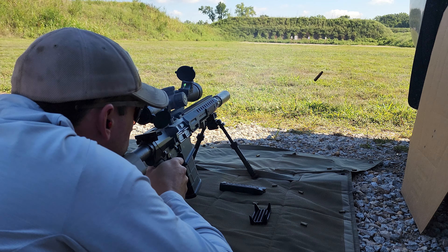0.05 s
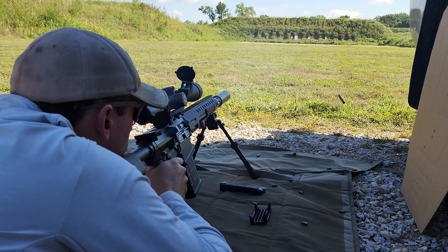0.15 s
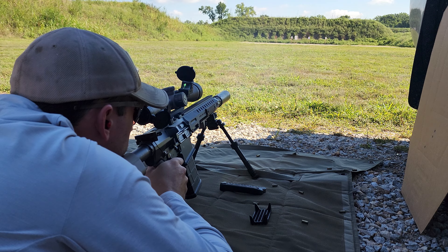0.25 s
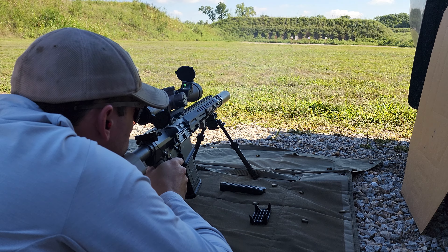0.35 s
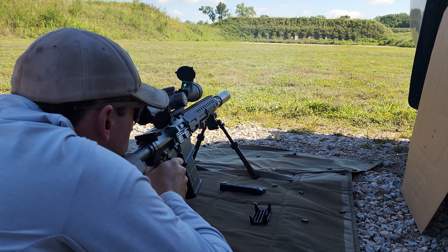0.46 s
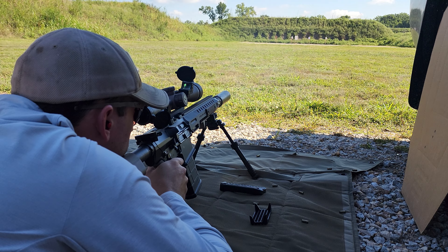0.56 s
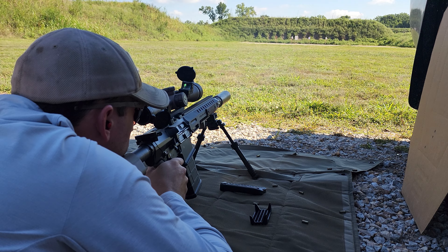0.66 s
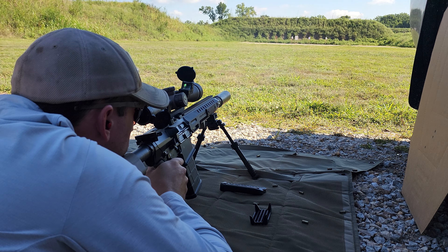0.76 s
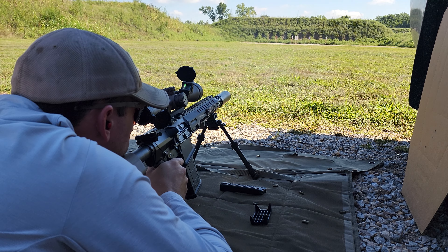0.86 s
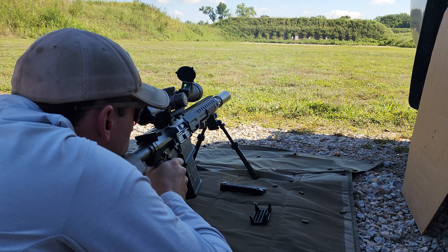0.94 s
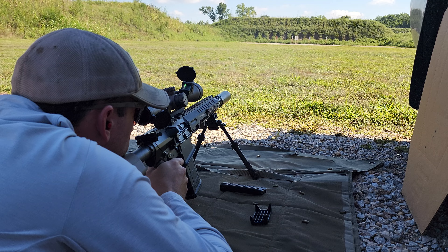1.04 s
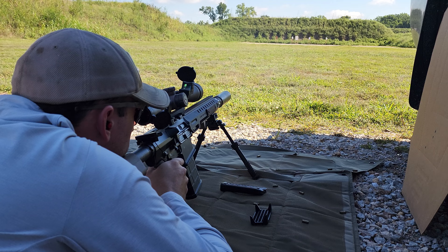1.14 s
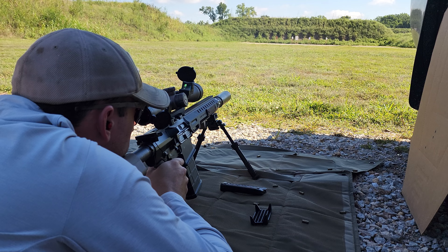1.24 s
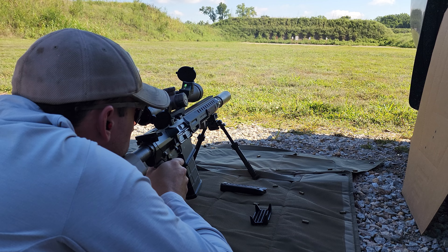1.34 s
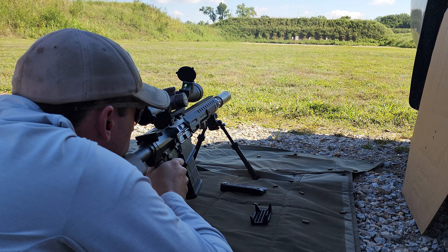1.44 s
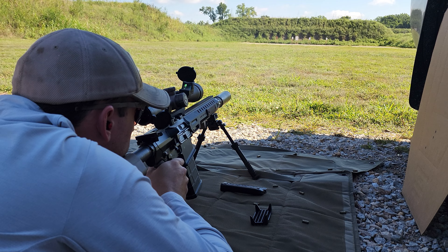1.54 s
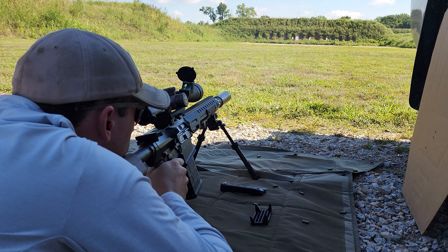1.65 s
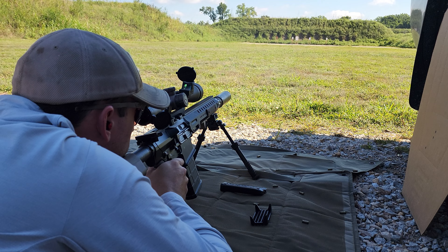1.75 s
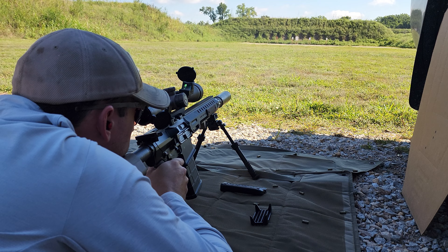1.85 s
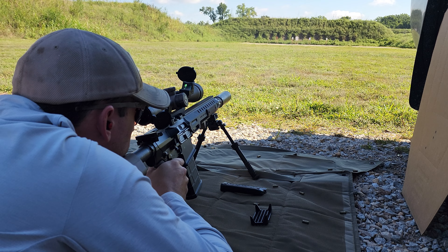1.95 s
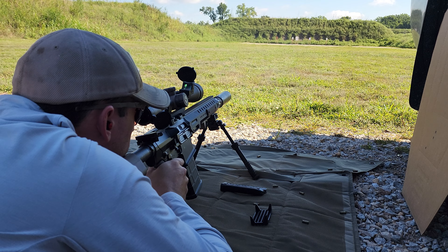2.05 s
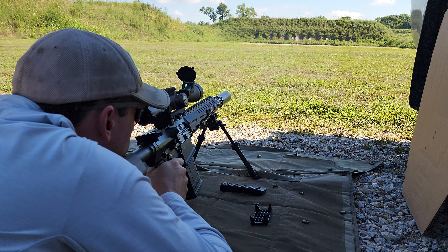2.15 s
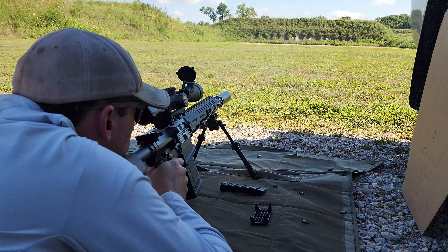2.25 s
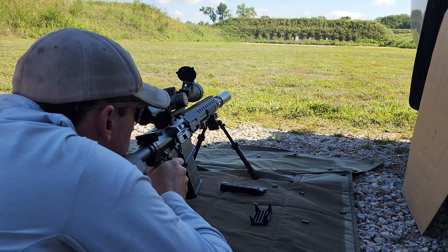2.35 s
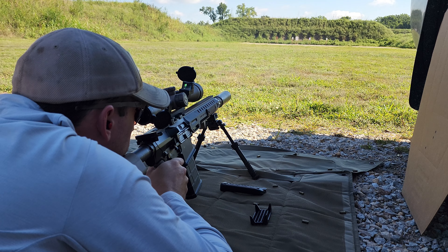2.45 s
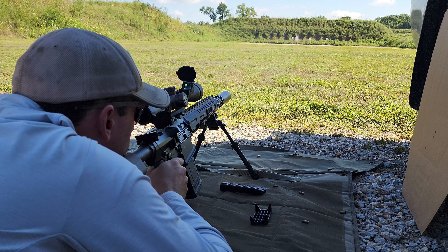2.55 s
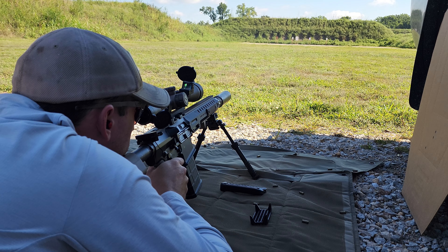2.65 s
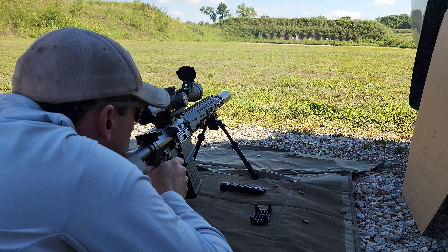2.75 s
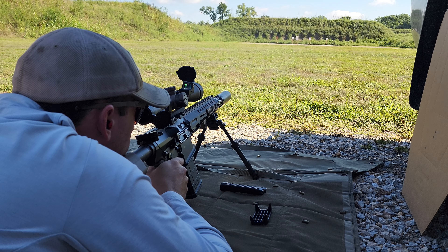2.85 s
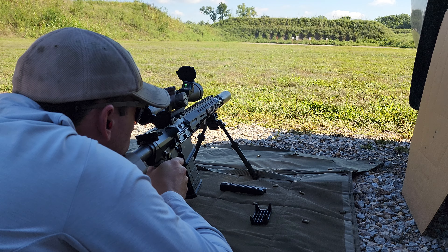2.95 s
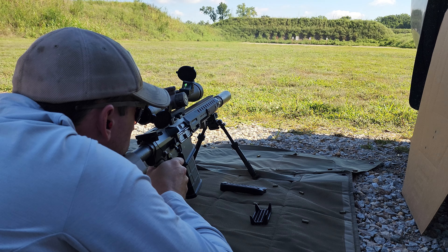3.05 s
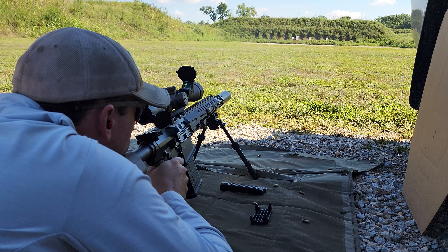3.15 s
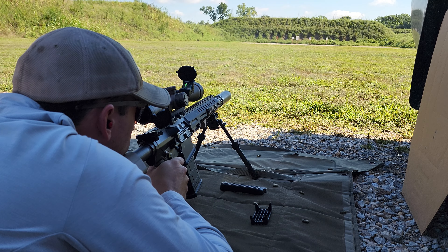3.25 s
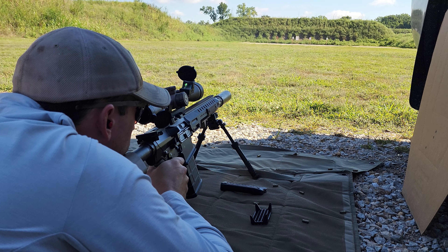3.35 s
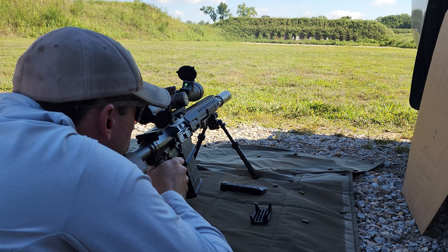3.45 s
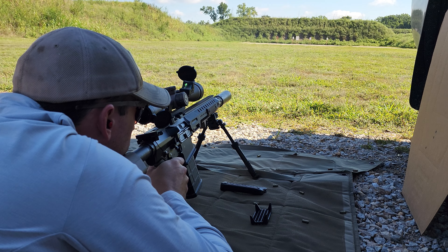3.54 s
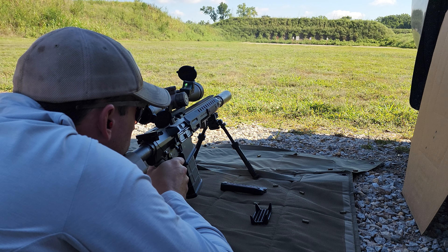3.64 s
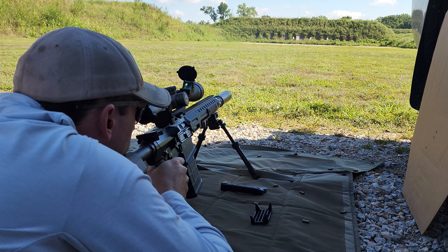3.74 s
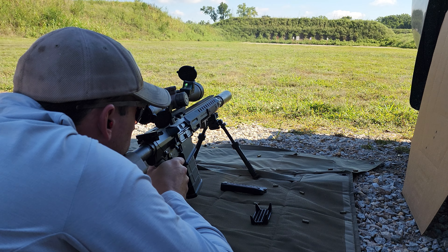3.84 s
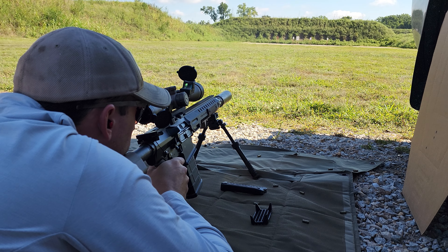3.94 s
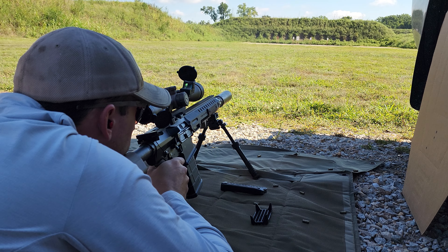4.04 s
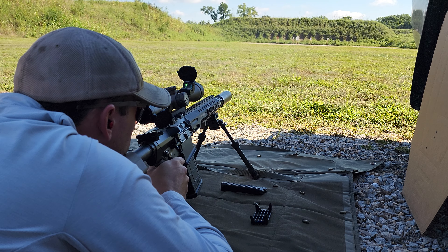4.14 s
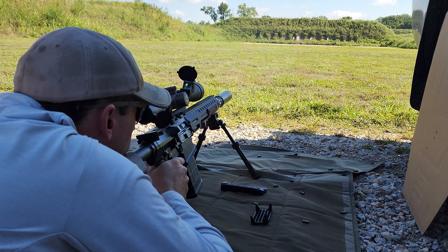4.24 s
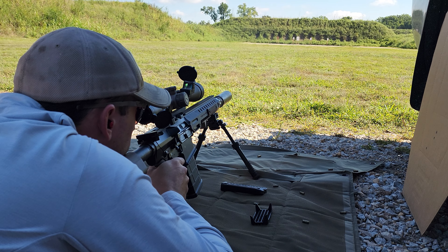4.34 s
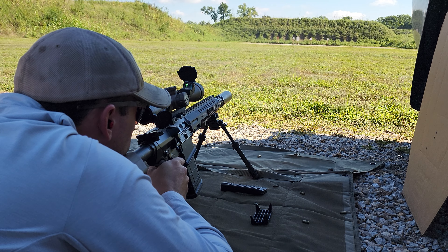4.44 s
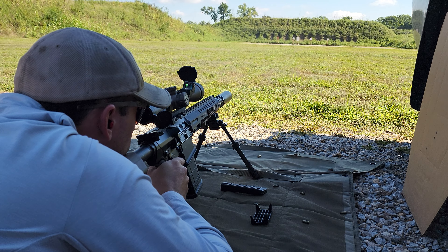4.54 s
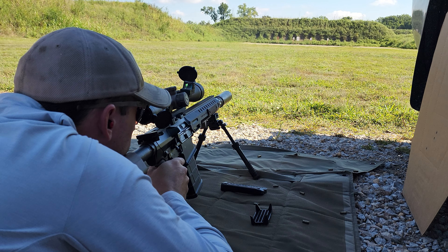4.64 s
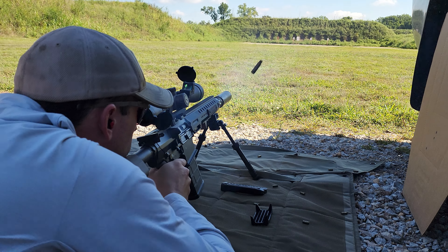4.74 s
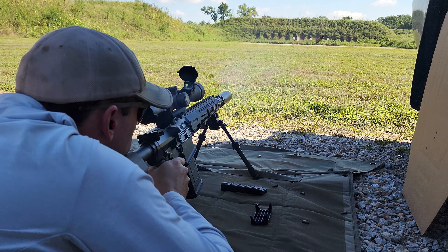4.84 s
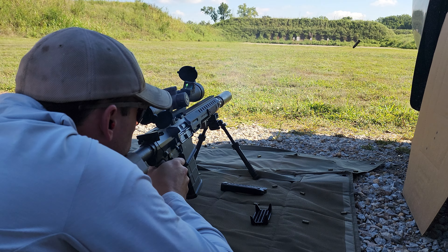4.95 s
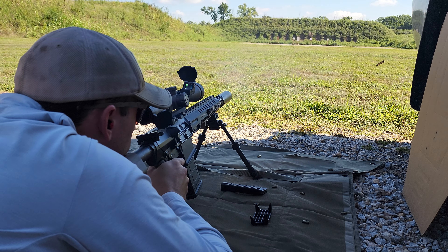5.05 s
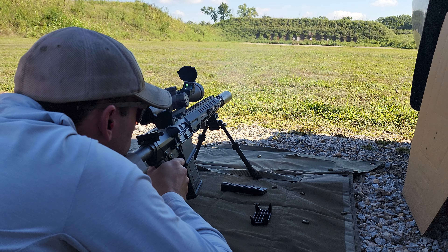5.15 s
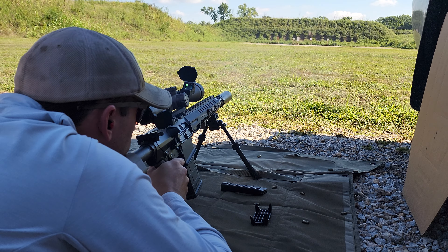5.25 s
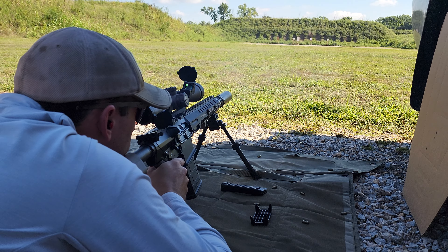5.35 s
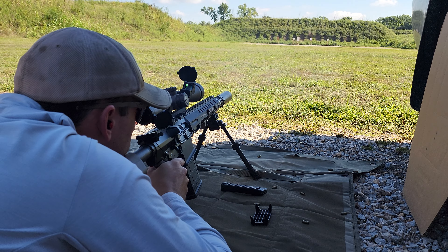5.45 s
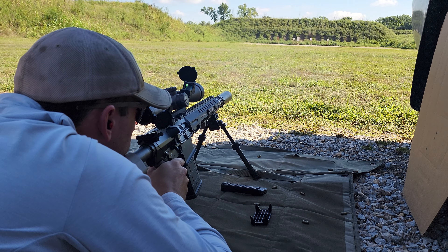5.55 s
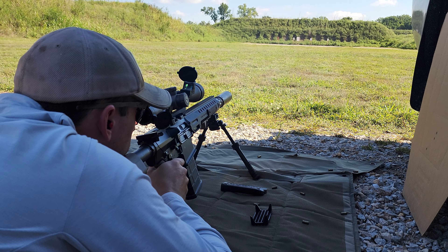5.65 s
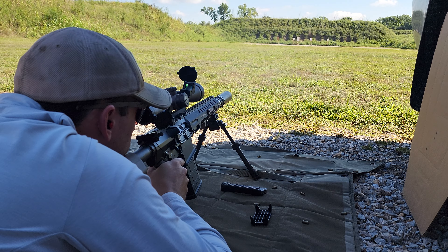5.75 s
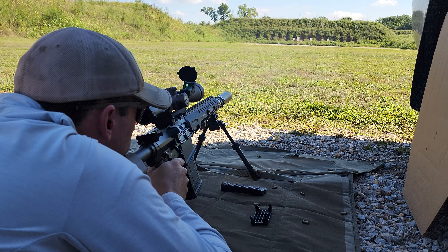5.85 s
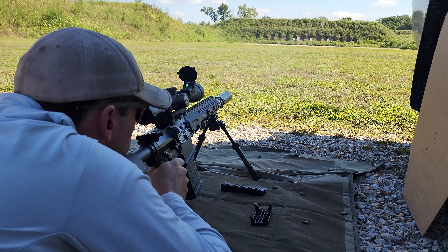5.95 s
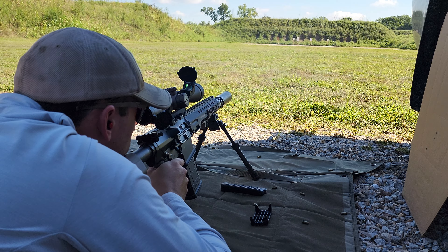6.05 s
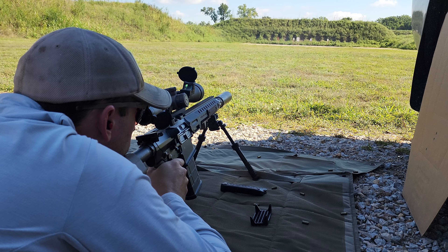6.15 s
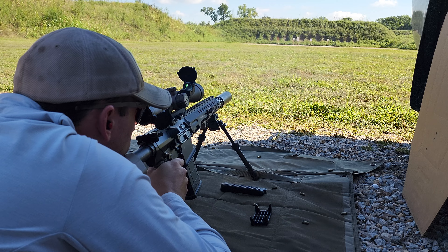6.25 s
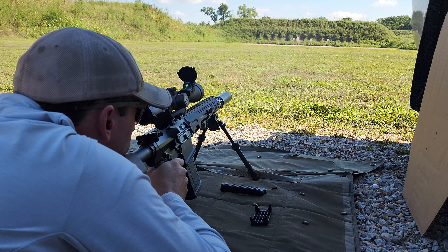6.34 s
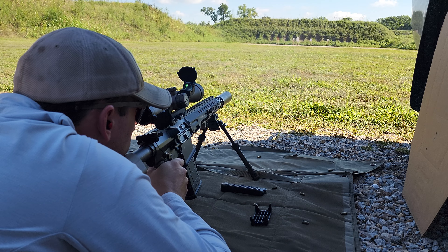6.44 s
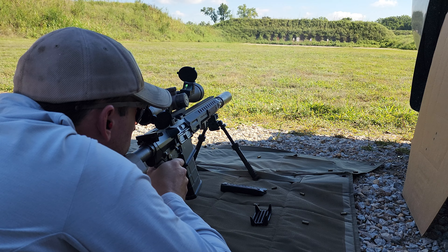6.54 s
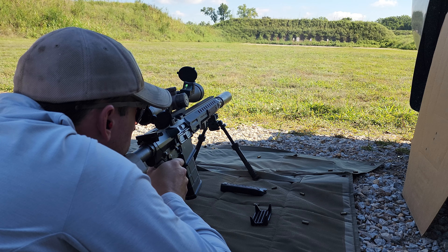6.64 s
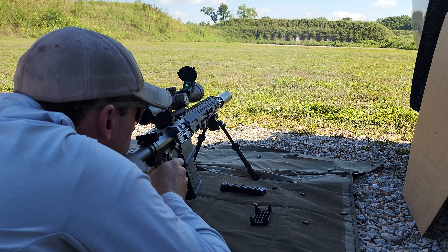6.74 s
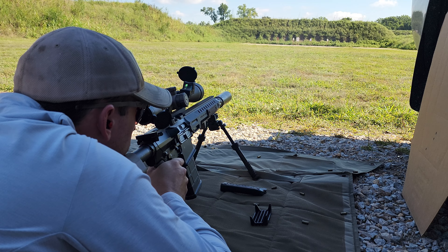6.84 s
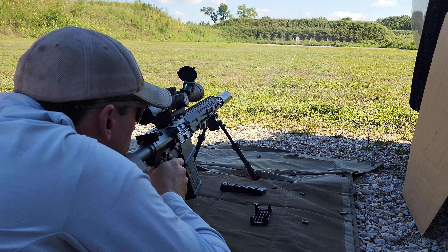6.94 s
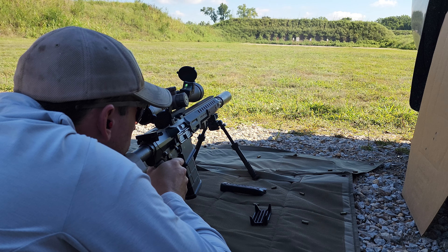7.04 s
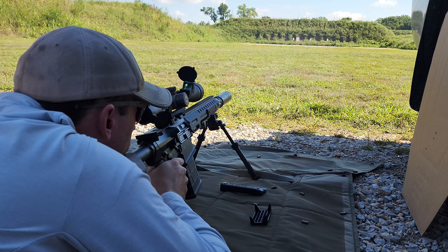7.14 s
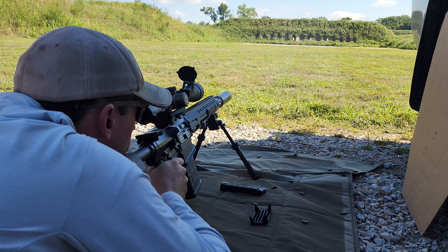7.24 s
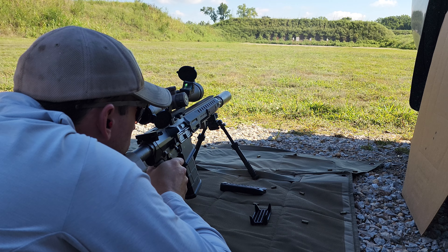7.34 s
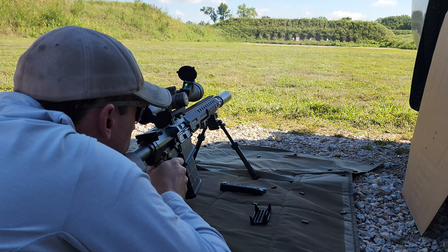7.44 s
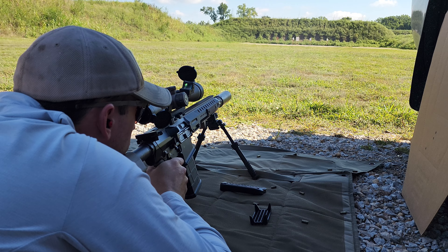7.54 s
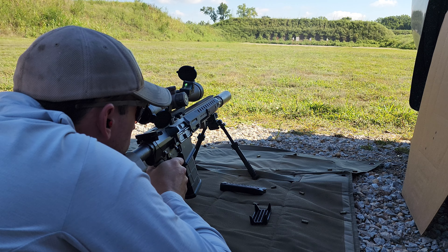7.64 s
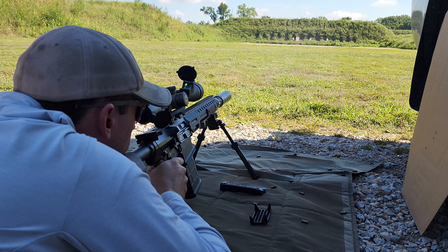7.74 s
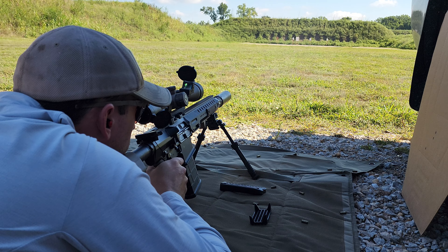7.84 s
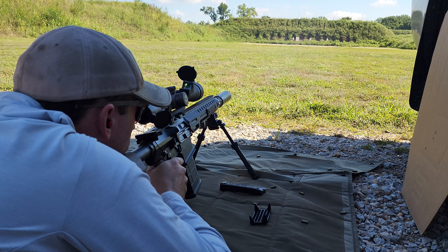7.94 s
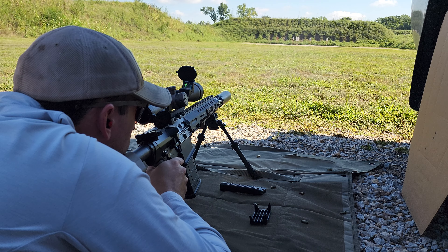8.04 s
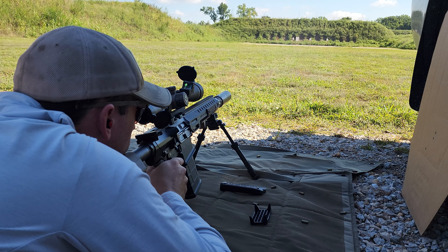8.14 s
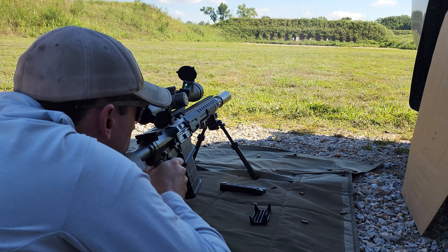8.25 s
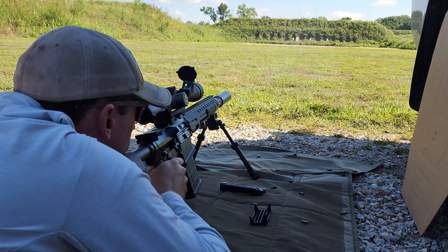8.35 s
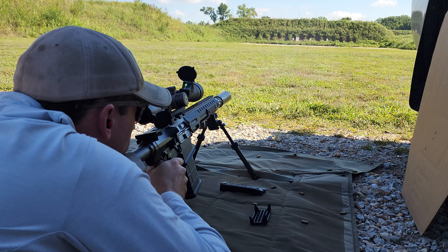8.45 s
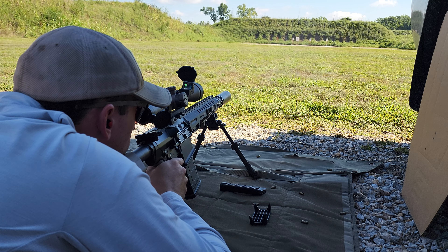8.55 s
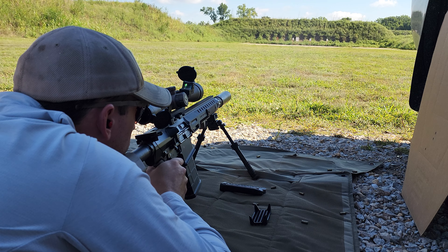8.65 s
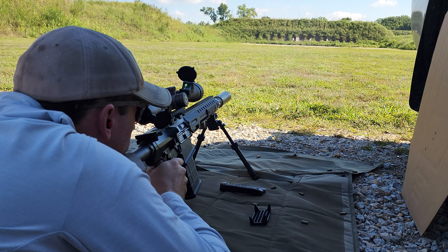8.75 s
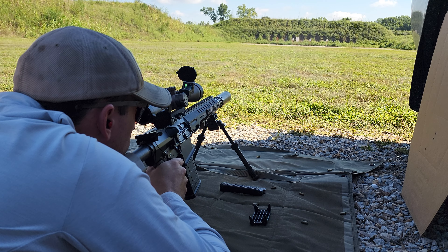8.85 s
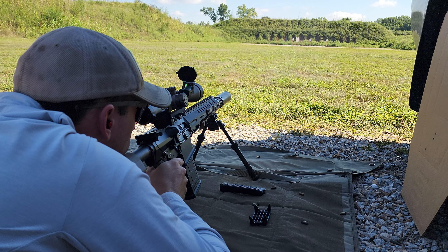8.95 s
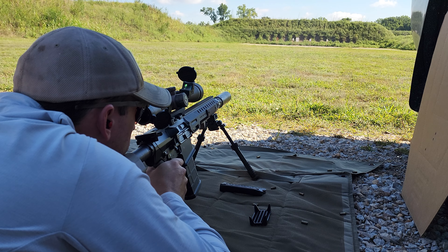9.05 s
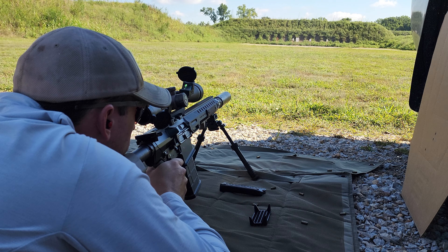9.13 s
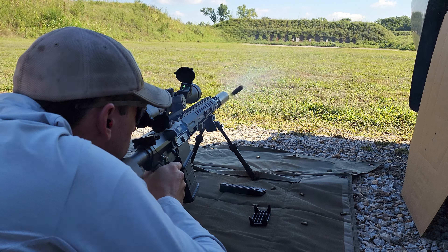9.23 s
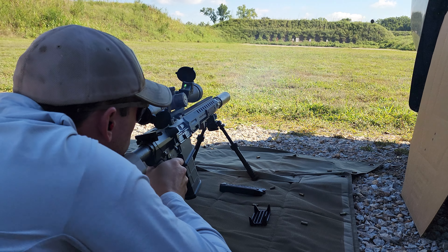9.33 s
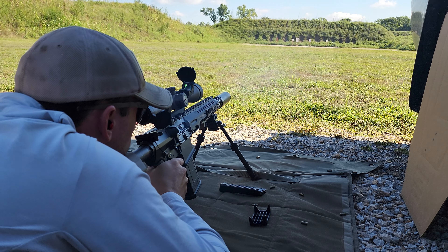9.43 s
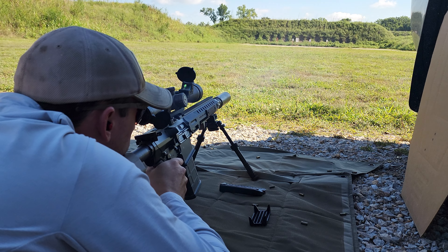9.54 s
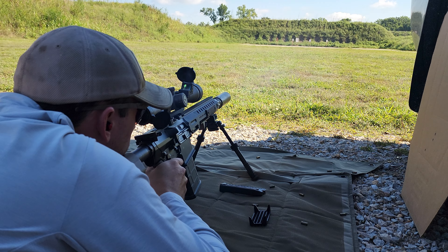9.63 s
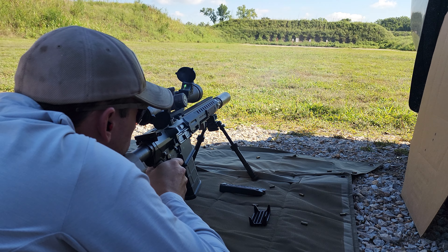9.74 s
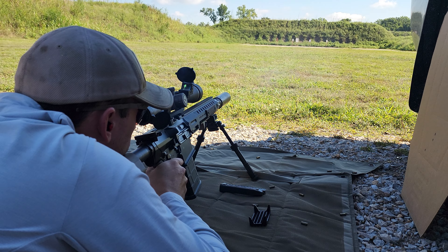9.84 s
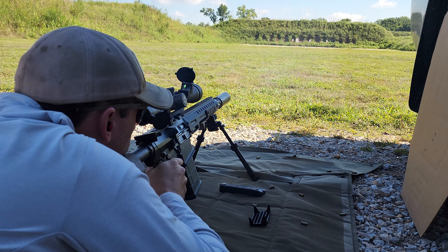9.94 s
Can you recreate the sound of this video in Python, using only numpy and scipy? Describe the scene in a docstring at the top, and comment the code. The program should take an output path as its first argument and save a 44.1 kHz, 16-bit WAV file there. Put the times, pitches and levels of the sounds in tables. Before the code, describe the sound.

At an open grassy range, a fading shot echo opens, then two muffled rifle cracks several seconds apart, the last with a spent case knocking a board.

```python
"""Opens on the echoes of a suppressed rifle shot fired just before the start; soft thumps and ringing brass follow.
Far booms, sharp clicks, faint tones and cricket chirps fill the gap to a close shot at 4.7 s and again to one at 9.3 s.
A short ringing noise rises just before each close shot's pressure pulse, gas burst and bolt slam; berms and tree lines
return the shot, and after the last a spent case hits a board. Distant motor hum, rumble and microphone hiss run
throughout; gain control ducks each shot. Sources are shaped noise, resonances and decaying sines."""
import sys
import numpy as np
from scipy import signal
from scipy.fft import rfft, irfft, next_fast_len
from scipy.io import wavfile
from scipy.ndimage import uniform_filter1d, map_coordinates

SR = 44100
rng = np.random.default_rng(int(sys.argv[2]) if len(sys.argv) > 2 else 0)


def output_pcm(signal):
    """Save a mono or channel-first signal as 16-bit PCM at the path in sys.argv[1].

    Samples are clipped to [-1, 1] before scaling.
    """
    pcm = np.clip(np.atleast_2d(signal).T, -1, 1) * 32767
    wavfile.write(sys.argv[1], SR, np.round(pcm).astype(np.int16))


N = 440559

# Levels are ahead of the gain control. side_db: left over right. Colours: relative level per Hz.
# close shots and the ringing rise ahead of each: start_s, strength_db, lowest_rise_hz
SHOTS = [(-0.146, 3, 896.3), (4.7121, 1.5, 1002), (9.251, 1, 740)]
# gain curve of the gas rush: rise_s, hold_s, t60_s, tail_db, tail_t60_s
GAS_BURST = (0.0036, 0.0078, 0.095, -9.5, 0.2793)
# gas colour: freq_hz, level_db
GAS_COLOUR = [(29, -36), (50, -1.5), (119, -10.5), (283, -5), (480, -10.5), (672, -4), (758, -7.5),
              (1720, -2), (2410, -7), (2590, -3.5), (6930, -8.5), (9030, -21.5), (15700, -15)]
# gain curve of the ringing rise: rise_s, hold_s, t60_s, tail_db, tail_t60_s
RINGING_BURST = (0.0299, 0.0028, 0.0427, -30, 0.1606)
# low tones of the ringing rise, as multiples of its lowest pitch: multiple, width_hz, level_db, side_db
RINGING_LOW_TONES = [(1.0, 179.9, -21, -8), (2.9, 220.2, -21, 2), (4.5, 299.9, -26, 10)]
# fixed tones of the ringing rise: pitch_hz, width_hz, level_db, side_db
RINGING_HIGH_TONES = [(4854, 310, -24, 11), (7608, 400, -26.5, 1), (10400, 300, -37, 9),
                      (12742, 350, -23, -9)]
# gain curve of the bolt slam: rise_s, hold_s, t60_s, tail_db, tail_t60_s
BOLT_BURST = (0.0088, 0.0015, 0.0375, -13, 0.1154)
# bolt colour: freq_hz, level_db
BOLT_COLOUR = [(290, -51.5), (500, -18), (999, -26.5), (1970, -5), (3030, -7), (3410, -6.5), (6610, -6.5),
               (8950, -23), (15700, -20.5)]
GAS_DB, RISE_POWER = -3.5, 3.3
PUSH_MS, PUSH_DB = .6, -4.5
THUD_HZ, THUD_DB, THUD_T60_S = 113.21, -21.5, 0.062
RINGING_BEFORE_S, RINGING_DB = .039, -19
BOLT_AFTER_S, BOLT_DB = 0.052426, -7.5

# banks and tree lines: after_shot_s, lasts_s, first_db, last_db, favoured_hz
REFLECTORS = [(0.089, 0.42557, -31, -38, 5560), (.118, 0.02828, -27.5, -22.5, 2214),
              (0.169, 0.12634, -23.5, -33.5, 2593), (0.314, 0.05052, -26, -30.5, 2800),
              (0.421, 0.08548, -36, -29, 2782), (0.587, 0.02472, -41, -40.5, 4500),
              (0.657, 0.68063, -36, -54, 1485), (.66, .1, -34, -35.5, 2000), (.75, .055, -36, -32, 1602),
              (.835, .055, -38, -41, 1700), (.89, .13, -43, -41.5, 1700),
              (1.073, 0.19006, -48.5, -47, 1472), (1.356, 0.07462, -46, -45, 2597),
              (1.569, 0.15386, -56, -54, 2305)]
# echo colour: freq_hz, level_db
ECHO_COLOUR = [(180, 3.5), (300, -21), (536, -14), (1150, -14), (2080, -4), (5010, -0.5), (6530, 3),
               (7580, 3), (9720, -11.5), (15700, -8)]
EDGE_S, FAVOUR_DB, FAVOUR_OCTAVES = 0.02542, 5, 0.4632
SCATTER_FROM_S, SCATTER_DB, SCATTER_T60_S = 0.1, -41.5, 5.04   # thin return of open ground
AIR_FROM_HZ, AIR_DB_PER_S_OCTAVE2 = 1033.9, 4   # loss grows with the square of octaves above

# case on board: start_s, level_db
BOARD_HITS = [(9.509, -14.5), (9.513, -13.5), (9.517, -13.5), (9.662, -25.5)]
# board modes: pitch_hz, level_db, t60_s
BOARD_MODES = [(181.6, -9, 0.1034), (514.67, -1, 0.03536), (1128.3, -9.5, 0.06864), (1449.3, -35.5, 0.3255),
               (1542.8, -26.5, 0.1647), (2456.4, -16, 0.06522)]
# case rings: start_s, level_db
BRASS_HITS = [(0.317, -43.5), (0.326, -33.5), (9.52, -53)]
# brass modes, close pairs beat: pitch_hz, level_db, t60_s
BRASS_MODES = [(9297, -36, .3), (12370, -14, .22), (14000, -18, .04), (14352, -2, .22), (14385, 0, .18),
               (14460, -8, .12)]

# sharp clicks: start_s, level_db, side_db
CLICKS = [(2.1983, -18, -3.5), (6.8044, -19.5, -1.5)]
# click gain curve: rise_s, hold_s, t60_s, tail_db, tail_t60_s
CLICK_BURST = (0.0001, 0.0051, 0.0362, -12, .08)
# click colour: freq_hz, level_db
CLICK_COLOUR = [(210, -52), (350, -31.5), (895, -4.5), (2180, -7), (3250, 2.5), (3630, -3.5), (4130, 0.5),
                (5320, -2.5), (7440, 0.5), (9140, -20), (15700, -12.5)]
# brief ring of each click: pitch_hz, level_db, t60_s
CLICK_MODES = [(3336.1, -2.5, .035), (4205.8, -3, .045), (5723, -1, .025), (6500, -7.5, 0.044),
               (7404.3, -4, 0.042)]
# soft thuds: start_s, level_db, centre_hz, t60_s, side_db
THUMPS = [(0.266, -32.5, 334.9, 0.0848, 16), (0.285, -39, 450, 0.07205, 1.5),
          (0.42, -43.5, 390, 0.06004, 0), (1.879, -60, 508.6, 0.04675, 19),
          (3.645, -57.5, 325.1, 0.0631, -2.5), (5.119, -33.5, 339, 0.06342, 8),
          (5.14, -40, 396.9, 0.0994, 4), (5.27, -42.5, 287.4, 0.07372, -0.5),
          (7.159, -63.5, 2799, 0.04267, 4.5), (9.662, -22.5, 173.3, 0.1208, 7)]
# far shots: start_s, push_db, push_hz, snap_db, side_db
BOOMS = [(1.1454, -34, 113.6, -33.5, -22), (6.1454, -31, 115.5, -33, -16.5)]
# faint tones: start_s, first_hz, glide_hz_per_s, level_db, t60_s
FAINT_TONES = [(2.812, 2050, 0, -73, .9), (6.07, 3800, 3500, -76, .3), (6.75, 2700, 3000, -73, .25),
               (6.755, 2250, 1000, -75, .18), (7.735, 3500, -8000, -75, .2)]

# chirps: last_stroke_middle_s, lasts_s, pitch_hz, level_db
CHIRPS = [(2.729, .164, 4450, -71), (3.185, .164, 4460, -69.5), (3.636, .164, 4480, -71),
          (4.14, .164, 4480, -70), (4.664, .164, 4440, -70), (6.194, .123, 4512, -71.5),
          (6.797, .123, 4460, -67), (7.651, .205, 4500, -70), (7.94, .082, 4700, -81.5),
          (8.282, .082, 4670, -80.5), (8.669, .082, 4703, -82), (9.181, .164, 4510, -71)]
STROKE_PERIOD_S, STROKE_S = .041, .034

# motor harmonics: multiple, level_db
MOTOR_HARMONICS = [(1, -52), (2, -58), (3, -84), (4, -84.5), (5, -92), (6, -94)]
MOTOR_HZ = 99.338
# wavering lines: centre_hz, resonator_width_hz, level_db
HUM_LINES = [(149, 8, -66), (230, 8, -78), (278, 4, -76), (658, 4, -91), (771, 4, -98)]
# drones that come and go: time_s, level_at_415_hz_db, level_at_545_hz_db
DRONES = [(0, -102, -79), (2, -80, -95), (3.3, -79.5, -87.5), (4.501, -89, -77.5), (6.5, -93, -73),
          (8.3, -83.5, -74), (10, -70.5, -70.5)]
# rumble colour: freq_hz, level_db
RUMBLE_COLOUR = [(15, -35.5), (30, -12), (55, -1.5), (120, -5), (200, -15.5), (260, -29), (450, -38),
                 (900, -48), (1500, -60.5)]
# rumble course: time_s, level_db
RUMBLE_COURSE = [(0, -50), (2, -52), (4.5, -53), (6, -53), (8.5, -52.5), (10, -48.5)]
# hiss colour: freq_hz, level_db
HISS_COLOUR = [(600, -44.5), (900, -17), (1500, -15), (2500, -26.5), (3600, -14), (5200, -20.5),
               (6200, -5.5), (7800, 1.5), (9500, -6), (11200, -1.5), (15700, -5.5)]
HISS_DB = -60.5

# left-right likeness, near sources: freq_hz, correlation
NEAR_ALIKE = [(60, 0.58), (240, 0.99887), (950, -0.13), (3770, 0.04), (15000, 0.07)]
# left-right likeness, spread sources: freq_hz, correlation
FAR_ALIKE = [(60, 0.64), (240, 0.85), (950, 0.3658), (3770, 0.1007), (15000, -0.299)]
# balance of the close blast: freq_hz, side_db
NEAR_BALANCE = [(60, -2), (300, -5), (900, -3), (2400, 3.5), (5000, 0), (8000, -2), (13000, -7)]

DUCK_FROM_DB, DUCK_SLOPE, DUCK_START_DB = -12, 1.0947, 11.5
RELEASE_DB_PER_S, ATTACK_S, CUTOFF_HZ = 3, 0.037, 15800


def amp(db):
    """dB to gain."""
    return 10 ** (np.asarray(db) / 20)


def rms_one(x):
    """Scale to unit rms."""
    return x / np.sqrt(np.mean(x ** 2) + 1e-20)


def at_hz(points, hz):
    """Read a spectrum table on a log-frequency axis."""
    table_hz, values = np.transpose(points)
    return np.interp(np.log(hz + 1), np.log(table_hz), values)


def pan(side_db):
    """Left and right gains for a level gap."""
    return amp(np.multiply.outer([.5, -.5], np.atleast_1d(side_db)))


def noise(size, colour, alike, balance=((1, 0), (2, 0))):
    """Stereo noise of a given colour, likeness and balance; rms 1."""
    hz = np.fft.rfftfreq(size, 1 / SR)
    mid, side = rfft(rng.standard_normal((2, size))) * amp(at_hz(colour, hz))
    c = np.clip(at_hz(alike, hz), -1, 1)
    pair = np.sqrt(1 + c) * mid + np.sqrt(1 - c) * side * [[1], [-1]]
    return rms_one(irfft(pair * pan(at_hz(balance, hz)), size))


def add(out, x, start_s):
    """Mix x in from start_s on, clipped to the scene."""
    i = round(start_s * SR)
    x = x[..., max(-i, 0):max(N - i, 0)]
    first = max(i, 0)
    out[..., first:first + x.shape[-1]] += x


def resonate(x, hz, width_hz):
    """Two-pole resonance, gain 1 on top."""
    r = np.exp(-np.pi * width_hz / SR)
    poles = [1, -2 * r * np.cos(2 * np.pi * hz / SR), r * r]
    return signal.lfilter([(1 - r * r) / 2, 0, (r * r - 1) / 2], poles, x)


def narrow(x, hz, width_hz):
    """Two equal resonances in series: a wavering tone, rms 1."""
    return rms_one(resonate(resonate(x, hz, width_hz), hz, width_hz))


def ring(hz, t60_s):
    """Exponentially decaying sine from height 1."""
    t = np.arange(int(t60_s * SR) + 1) / SR
    return np.sin(2 * np.pi * hz * t) * amp(-60 * t / t60_s)


def drift(size, rate_hz):
    """Smooth random curve through normal knots."""
    knots = rng.standard_normal(int(size / SR * rate_hz) + 2)
    return map_coordinates(knots, [np.arange(size) / SR * rate_hz], order=2)


def burst(rise_s, hold_s, t60_s, tail_db, tail_t60_s):
    """Gain curve: curved rise, hold, then a quick decay over a slower tail."""
    t = np.arange(0, rise_s + hold_s + max(t60_s, tail_t60_s), 1 / SR)
    after = np.maximum(t - rise_s - hold_s, 0)
    fall = np.maximum(amp(-60 * after / t60_s), amp(tail_db - 60 * after / tail_t60_s))
    return np.minimum(t / rise_s, 1) ** RISE_POWER * fall


def ringing_rise(out, shot_s, strength_db, lowest_hz):
    """Short ringing noise rising just before the shot: noise and narrow resonances under one gain curve."""
    shape = burst(*RINGING_BURST)
    start_s = shot_s - RINGING_BEFORE_S
    rush = noise(len(shape), GAS_COLOUR, NEAR_ALIKE, NEAR_BALANCE)
    add(out, amp(strength_db + RINGING_DB) * shape * rush, start_s)
    low_tones = [(multiple * lowest_hz, *rest) for multiple, *rest in RINGING_LOW_TONES]
    for hz, width_hz, tone_db, side_db in low_tones + RINGING_HIGH_TONES:
        tone = narrow(rng.standard_normal(len(shape)), hz, width_hz)
        add(out, amp(strength_db + tone_db) * pan(side_db) * shape * tone, start_s)


def muzzle(out, shot_s, strength_db):
    """N-shaped pressure pulse, rush of gas, and recoil thud through bipod and ground."""
    shape = burst(*GAS_BURST)
    gas = shape * noise(len(shape), GAS_COLOUR, NEAR_ALIKE, NEAR_BALANCE)
    add(out, amp(strength_db + GAS_DB) * gas, shot_s - GAS_BURST[0] / 2)
    push = np.linspace(1, -1, int(PUSH_MS * SR / 1000))
    add(out, amp(strength_db + PUSH_DB) * push, shot_s)
    thud = pan(-2.0) * ring(THUD_HZ, THUD_T60_S)
    add(out, amp(strength_db + THUD_DB) * thud, shot_s - .004)


def bolt(out, shot_s, strength_db):
    """The bolt slams home: a bright noise burst after the shot."""
    shape = burst(*BOLT_BURST)
    slam = shape * noise(len(shape), BOLT_COLOUR, FAR_ALIKE)
    add(out, amp(strength_db + BOLT_DB) * slam, shot_s + BOLT_AFTER_S)


def reports(out):
    """Muzzle and bolt of each close shot, with the ringing noise heard just before it."""
    for shot_s, strength_db, lowest_rise_hz in SHOTS:
        ringing_rise(out, shot_s, strength_db, lowest_rise_hz)
        muzzle(out, shot_s, strength_db)
        bolt(out, shot_s, strength_db)


def echo_power(t, centres_hz):
    """Returned power per band: ground scatter plus reflectors, each favouring a pitch."""
    scatter = (t > SCATTER_FROM_S) * amp(SCATTER_DB - 60 * t / SCATTER_T60_S) ** 2
    power = np.tile(scatter, (len(centres_hz), 1))
    for after_s, lasts_s, first_db, last_db, favoured_hz in REFLECTORS:
        i = max(int((after_s - EDGE_S) * SR), 0)
        j = int((after_s + lasts_s + EDGE_S) * SR)
        u = t[i:j] - after_s
        edges = np.clip(np.minimum(u, lasts_s - u) / EDGE_S / 2 + .5, 0, 1) ** 2
        octaves = np.log2(centres_hz / favoured_hz)
        favour_db = FAVOUR_DB * np.exp(-(octaves / FAVOUR_OCTAVES) ** 2)
        course = edges * amp(first_db + (last_db - first_db) * u / lasts_s)
        power[:, i:j] += np.outer(amp(favour_db), course) ** 2
    return power


def echoes(out, flicker_db=2.5):
    """Scattered returns in third-octave noise bands; air dulls late ones, each band flickers."""
    t = np.arange(2 * SR) / SR
    hz = np.fft.rfftfreq(len(t), 1 / SR)
    centres_hz = 250 * 2 ** np.arange(0, 6.1, 1 / 3)
    power = echo_power(t, centres_hz)
    for shot_s, strength_db, _ in SHOTS:
        returns = rfft(noise(len(t), ECHO_COLOUR, FAR_ALIKE))
        for centre_hz, band_power in zip(centres_hz, power):
            band = np.clip(1 - 3 * np.abs(np.log2((hz + 1) / centre_hz)), 0, 1)
            octaves_above = max(np.log2(centre_hz / AIR_FROM_HZ), 0)
            air_db = -AIR_DB_PER_S_OCTAVE2 * t * octaves_above ** 2
            level_db = strength_db + air_db + flicker_db * drift(len(t), 35.003)
            add(out, np.sqrt(band_power) * amp(level_db) * irfft(returns * band, len(t)), shot_s)


def cases(out):
    """Spent cases knock on a board and ring as brass tubes, mode levels drawn per hit."""
    for hits, modes in ((BOARD_HITS, BOARD_MODES), (BRASS_HITS, BRASS_MODES)):
        for start_s, db in hits:
            for hz, mode_db, t60_s in modes:
                add(out, amp(db + mode_db + rng.normal(0, 1.5)) * ring(hz, t60_s), start_s)
    t = np.arange(3000) / SR
    for start_s, db in BOARD_HITS:
        knock = noise(len(t), GAS_COLOUR, FAR_ALIKE) * amp(-60 * t / 0.08483)
        add(out, amp(db - 8.5) * knock, start_s)


def clicks(out):
    """Sharp bright clicks with a brief ring: noise bursts plus decaying sines."""
    shape = burst(*CLICK_BURST)
    for start_s, db, side_db in CLICKS:
        add(out, amp(db) * pan(side_db) * shape * noise(len(shape), CLICK_COLOUR, NEAR_ALIKE), start_s)
        for hz, mode_db, t60_s in CLICK_MODES:
            gain = amp(db + mode_db + rng.normal(0, 2, (2, 1))) * pan(side_db)
            add(out, gain * ring(hz, t60_s), start_s + rng.uniform(.003, .005))


def thumps(out):
    """Soft thuds: decaying noise peaked at one frequency."""
    t = np.arange(4400) / SR
    for start_s, db, hz, t60_s, side_db in THUMPS:
        colour = [(hz / 4, -14), (hz, 0), (hz * 1.7554, -9), (hz * 6, -30), (hz * 30, -50)]
        gain = amp(db - 60 * t / t60_s) * np.minimum(t / 0.004354, 1) * pan(side_db)
        add(out, gain * noise(len(t), colour, FAR_ALIKE), start_s)


def booms(out):
    """Far shots: one slow push, a fast-dying low sine, with a snap in it."""
    for start_s, push_db, hz, snap_db, side_db in BOOMS:
        add(out, -amp(push_db) * pan(side_db) * ring(hz, 4.917 / hz), start_s - .0017)
        add(out, -amp(snap_db) * pan(side_db) * ring(2014.3, 0.001777), start_s)


def faint_tones(out):
    """Decaying, flickering sines, most gliding in pitch."""
    for start_s, hz, glide, db, t60_s in FAINT_TONES:
        u = np.arange(0, t60_s, 1 / SR)
        tone = np.sin(2 * np.pi * (hz * u + glide * u ** 2 / 2)) * np.minimum(u / .03, 1)
        add(out, amp(db - 60 * u / t60_s + 5 * drift(len(u), 120)) * tone, start_s)


def crickets(out):
    """Chirps of rough wing strokes that sag in pitch; first strokes are lower and softer."""
    t = np.arange(0, STROKE_S, 1 / SR)
    u = t / STROKE_S
    for last_s, lasts_s, hz, db in CHIRPS:
        for k in range(round(lasts_s / STROKE_PERIOD_S)):   # k counts back from the last stroke
            sag = .1 * (u - .45) ** 2 + .05 * u ** 5
            pitch_hz = hz * (1.01 - .0022 * k ** 2 - sag + .005 * drift(len(t), 400))
            stroke = np.sin(np.pi * u) ** 0.5 * np.sin(2 * np.pi * np.cumsum(pitch_hz) / SR)
            stroke = np.convolve(stroke, np.r_[1, np.zeros(500), .45])   # return from the grass bank
            gain = amp(db - 0.93 * k + 4.8 * drift(len(stroke), 200)) * pan(1.5)
            add(out, gain * stroke, last_s - k * STROKE_PERIOD_S - STROKE_S / 2)


def motor_hum():
    """Distant motor: drifting harmonics, narrow noise lines and two drones."""
    t, white = np.arange(N) / SR, rng.standard_normal(N)
    turn = 2 * np.pi * np.cumsum(MOTOR_HZ * (1 + .006 * drift(N, 3))) / SR
    hum = np.zeros(N)
    for k, db in MOTOR_HARMONICS:
        hum += amp(db + 2.5 * drift(N, 7.1)) * np.sqrt(2) * np.sin(k * turn)
    for hz, width_hz, db in HUM_LINES:
        hum += amp(db) * narrow(white, hz, width_hz)
    time_s, low_db, high_db = np.transpose(DRONES)
    for hz, db in ((415, low_db), (545, high_db)):
        hum += amp(np.interp(t, time_s, db)) * narrow(white, hz, 16)
    return hum


def rumble():
    """Low noise, its level following a slow course."""
    low = noise(next_fast_len(N), RUMBLE_COLOUR, [(100, 1.0), (400, 0.27), (1000, .3)])[:, :N]
    return amp(np.interp(np.arange(N) / SR, *np.transpose(RUMBLE_COURSE))) * low


def hiss():
    """Steady microphone noise, all but unrelated left to right."""
    return amp(HISS_DB) * noise(next_fast_len(N), HISS_COLOUR, [(100, 0), (200, 0.0081)])[:, :N]


def scene():
    """Everything at the microphones."""
    out = motor_hum() + rumble() + hiss()
    for source in (reports, echoes, cases, clicks, thumps, booms, faint_tones, crickets):
        source(out)
    return out


def record(dry):
    """Gain control ducks after loud sounds and creeps back; peaks are rounded, the top is cut."""
    power = uniform_filter1d(np.mean(dry ** 2, axis=0), size=441)   # 10 ms
    level_db = 10 * np.log10(power + 1e-12)
    want_db = DUCK_SLOPE * np.maximum(level_db - DUCK_FROM_DB, 0)
    want_db[0] = DUCK_START_DB   # still down from the shot just before
    ramp_db = RELEASE_DB_PER_S * np.arange(N) / SR
    held_db = np.maximum.accumulate(want_db + ramp_db) - ramp_db
    r = np.exp(-1 / (ATTACK_S * SR))
    duck_db = signal.lfilter([1 - r], [1, -r], held_db, zi=[r * DUCK_START_DB])[0]
    wet = np.tanh(dry * amp(-duck_db))
    return signal.sosfilt(signal.ellip(14, .5, 96, CUTOFF_HZ, fs=SR, output="sos"), wet)


dry = scene()
out = record(dry)
output_pcm(out)
```